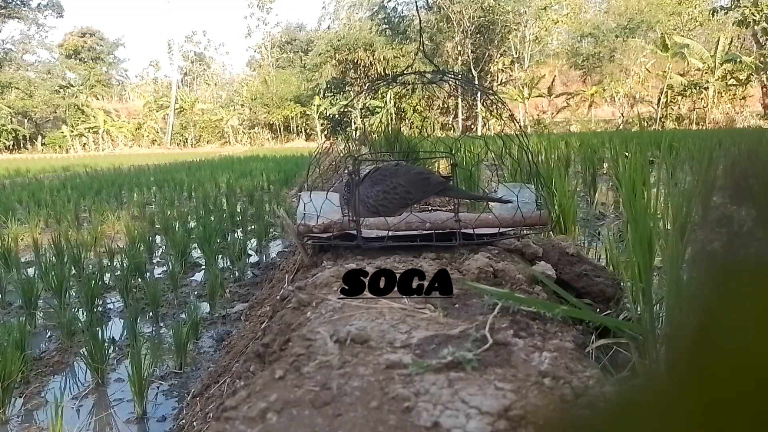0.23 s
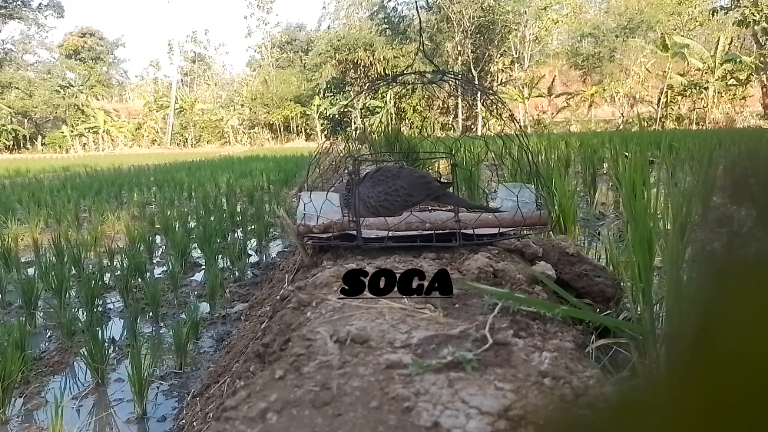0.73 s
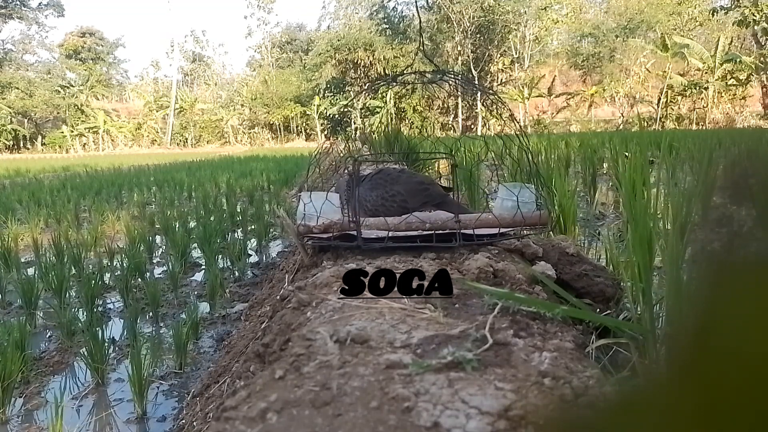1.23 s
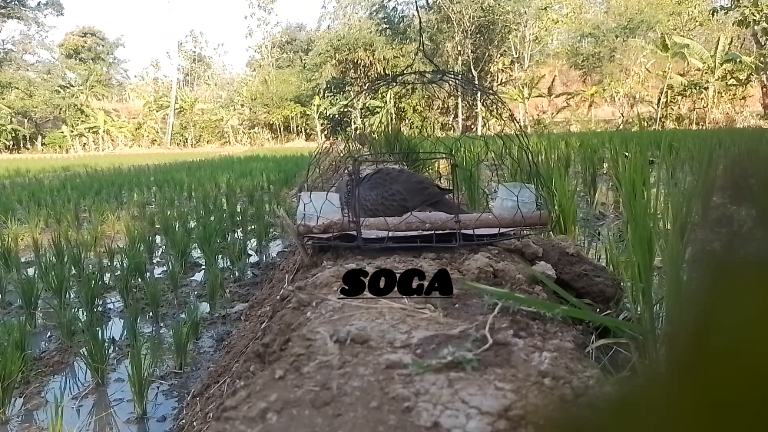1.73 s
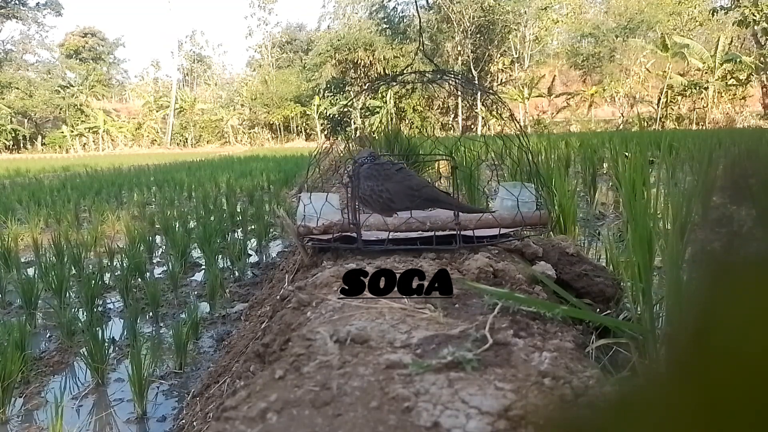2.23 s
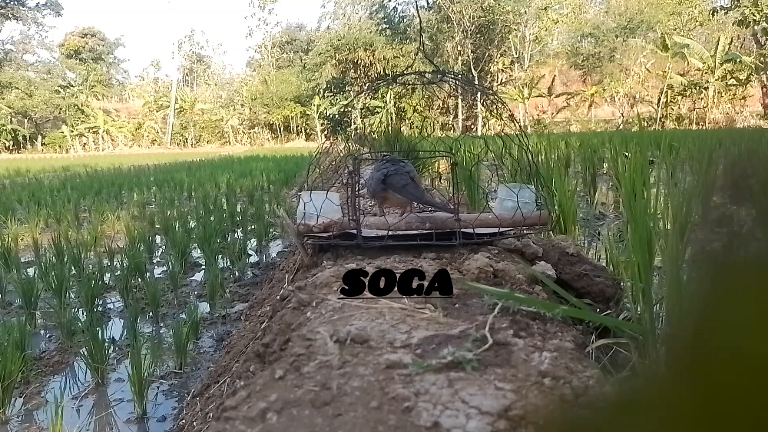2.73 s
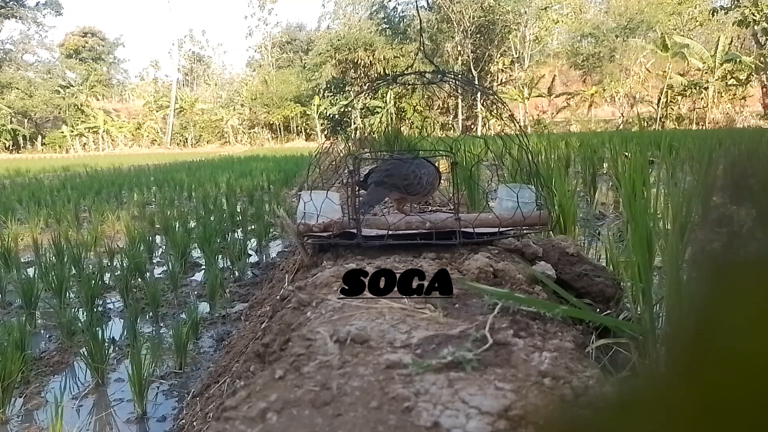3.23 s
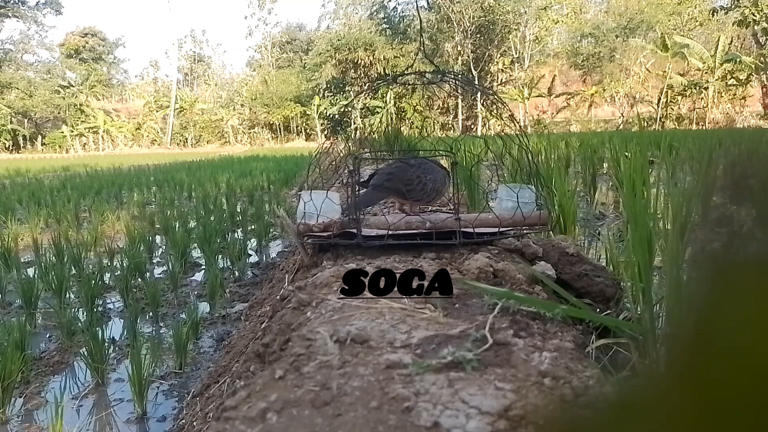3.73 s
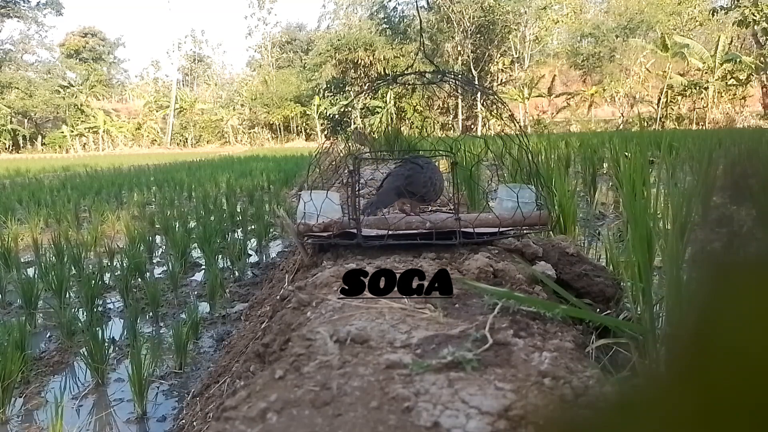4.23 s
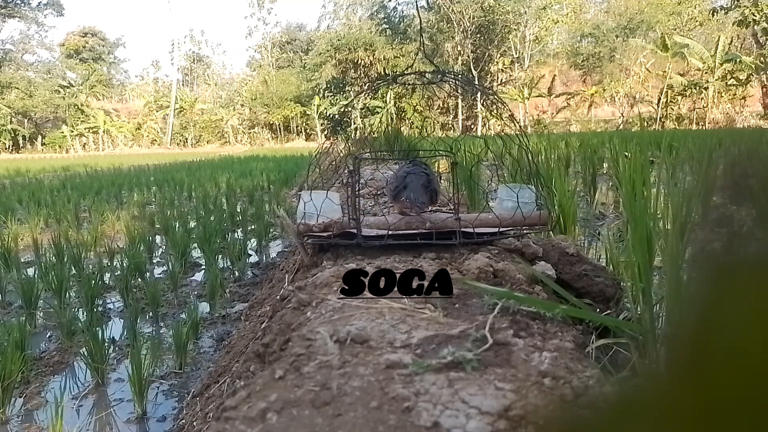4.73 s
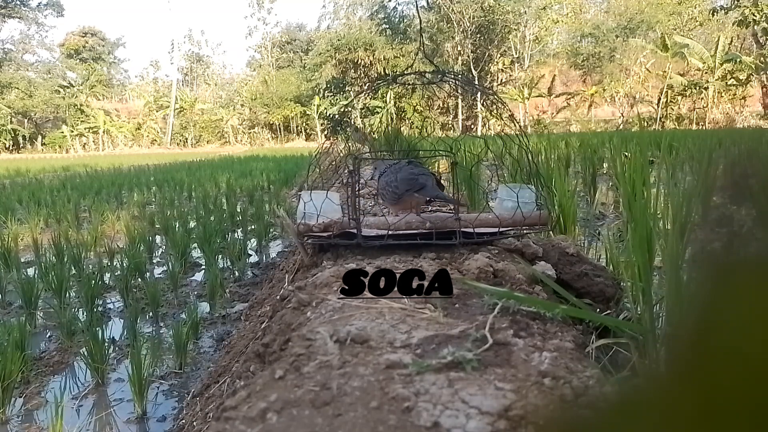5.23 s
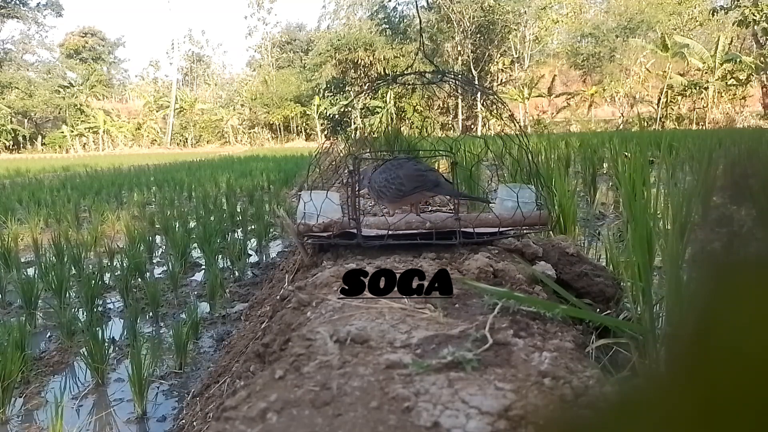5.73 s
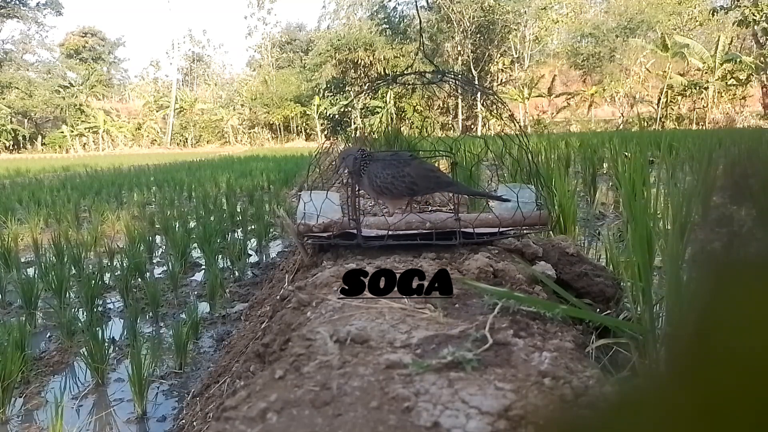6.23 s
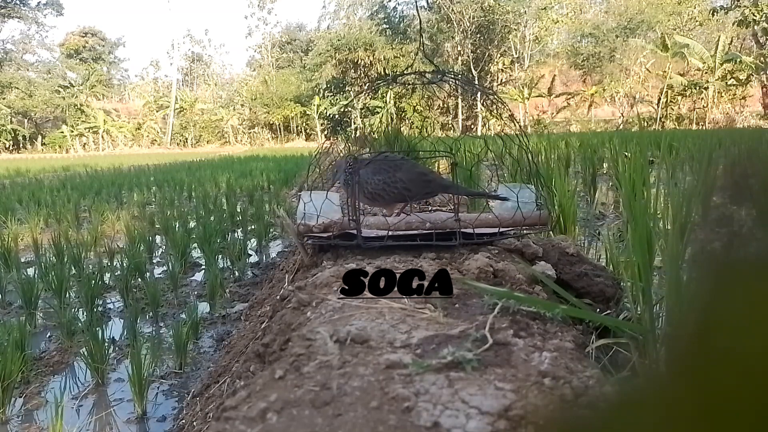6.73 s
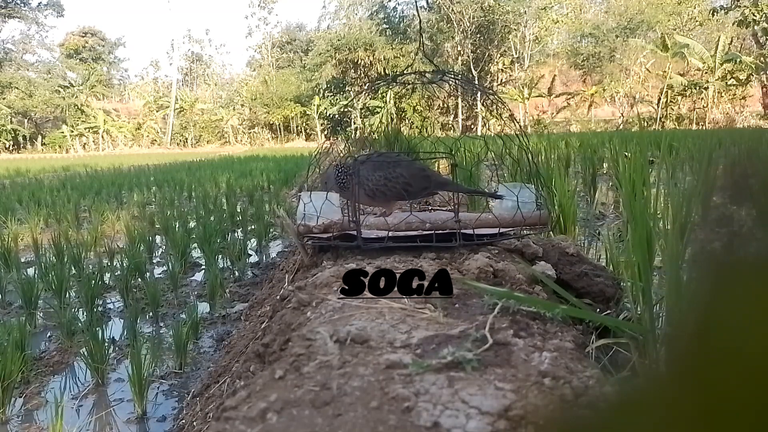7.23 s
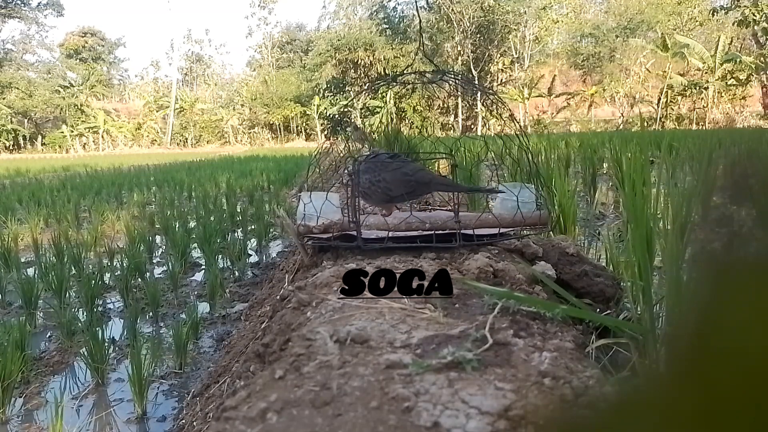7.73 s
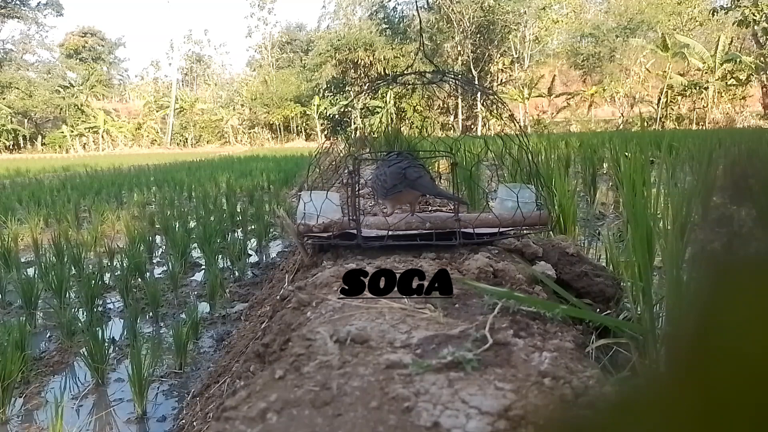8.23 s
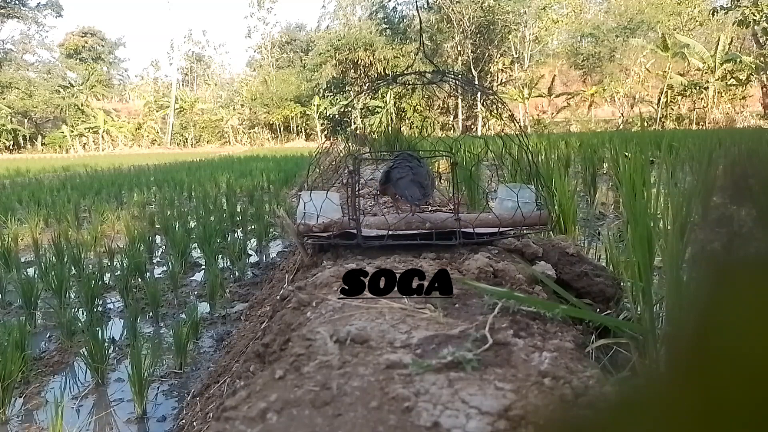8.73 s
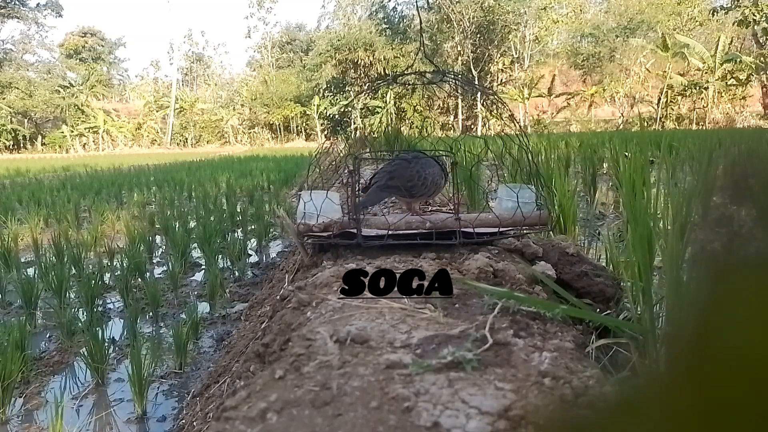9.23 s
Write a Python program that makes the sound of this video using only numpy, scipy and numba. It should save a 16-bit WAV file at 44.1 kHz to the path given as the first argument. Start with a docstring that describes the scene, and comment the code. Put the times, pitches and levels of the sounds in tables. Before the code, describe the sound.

Open rice fields, very quiet soft hum and hiss. A caged dove close to the microphone coos in a hoarse, fluttering low-mid voice around 600 to 700 Hz: a loud half-second coo at 0.1 s, a short one at 0.9, a long one at 1.25, the long ones arching in pitch and ending in a weaker sob. From 1.9 s it has turned away: much softer, slightly lower coos, long at 1.9, 3.2, 4.4, 5.6, 6.8, 8.0 and 9.2, each later one preceded by a short coo. Bright high crickets trill in pulses, strongest around 1.5 to 2.3 s, a second lasting until about 3.6, then only a very faint one from 4 to 9 s. Light cage ticks come near 0.3, 2.1, 4.7, 5.3 and 6.4 s. Distant doves coo faintly in between. From about 2 s a barely audible far engine drones, slowly rising in pitch, then sagging near the end. Soft tree echoes.

```python
"""Caged dove on a paddy bank

A dove coos in short and long notes, first facing the microphones, then turned away and weaker.
Its hoarse tone comes from a phase that runs ahead and slips back on the beats of a slow flutter.
Far doves call with a milder form of that voice; three crickets chirp in runs of gliding wing strokes;
noise bursts through resonances tick on the cage; a distant engine drones in multiples of its firing rate;
shaped noise makes the soft hum and hiss of the fields, and decaying noise makes the echoes."""
import sys
import numpy as np
from scipy import signal
from scipy.fft import rfft, irfft, next_fast_len
from scipy.io import wavfile
from scipy.ndimage import uniform_filter1d
from numba import njit

SR = 44100
rng = np.random.default_rng(int(sys.argv[2]) if len(sys.argv) > 2 else 0)


def dump_mix(stems):
    """Bounce the given channels to the path in sys.argv[1] as a 16-bit WAV at rate SR."""
    frames = np.atleast_2d(stems).T  # one column per channel
    limited = np.clip(frames, -1, 1)  # hard clip at full scale
    pcm = np.round(limited * 32767).astype(np.int16)
    wavfile.write(sys.argv[1], SR, pcm)


N = 418509  # samples
TURN_S = 1.85  # the dove turns away


def undb(db):
    """Decibels to an amplitude ratio: 20 dB per factor of ten."""
    return 10 ** (np.asarray(db) / 20)


def unit(x):
    """Normalisation to a root-mean-square of 1."""
    return x / np.sqrt(np.mean(np.abs(x) ** 2))


def slew(x, ms):
    """One-pole smoothing: exponential relaxation with a time constant in ms."""
    keep = np.exp(-1000 / (ms * SR))
    return signal.lfilter([1 - keep], [1, -keep], x)


def spin(hz):
    """Complex rotation: phase is the running sum of frequency."""
    return np.exp(2j * np.pi * np.cumsum(hz) / SR)


@njit
def svf(x, hz, width):
    """State-variable resonance: a band-pass with gain 1 at its centre."""
    y, b, l = np.empty(len(x)), 0., 0.
    g, k = np.tan(np.pi * hz / SR), width / hz
    for i in range(len(x)):
        v = (b + g * (x[i] - l)) / (1 + g * (g + k))
        b, l, y[i] = 2 * v - b, l + 2 * g * v, k * v
    return y


def band(x, hz, width_hz):
    """Cascaded resonances: the band-pass applied twice has steeper skirts."""
    once = svf(x, 1. * hz, 1. * width_hz)
    return svf(once, 1. * hz, 1. * width_hz)


def walk(rate):
    """Slow random modulation: levels held for 1 / rate s, smoothed twice, spread 1."""
    k = int(SR / rate)
    steps = np.repeat(rng.standard_normal(N // k + 1), k)
    smooth = uniform_filter1d(uniform_filter1d(steps, k), k)
    return unit(smooth[:N])


def place(x, pan_db, size):
    """Stereo cues at two microphone ports: a level difference, and the left hears size samples later."""
    return np.array([np.roll(x, size) * undb(pan_db / 2), x * undb(-pan_db / 2)])


def fields():
    """Coherence of diffuse noise: ports most alike near 600 Hz, less in the bass, little in the treble."""
    # spectrum of the open land: frequency_hz, density_db (relative, per Hz),
    # likeness of the ports (0-1), left_minus_right_db
    spectrum = [(25, -22.5, 0, 1), (61, -18.5, 0.3, -2.5), (94, -15.5, 0.4, -1), (123, -18.5, 0.5, 0),
                (157, -26, 0.7, 1.5), (237, -5.5, 0.7, 2.5), (335, -5.5, 0.6, 0), (617, -7.5, 1, 2.5),
                (1090, -23, 0, 2), (2230, -20, 0.05, 2.5), (3500, -21.5, 0, 0.5), (4480, -19, 0.3, 1.5),
                (5410, -23.5, 0, 6), (7080, -17.5, 0, 10.5), (7900, -21.5, 0, 3.5), (9420, -22.5, 0.3, -6),
                (10600, -34, 0.04, 1), (13400, -34.5, 0.11, -0.5)]
    level_db = -64.5
    size = next_fast_len(N)
    hz = np.fft.rfftfreq(size, 1 / SR) + 1  # 1 Hz up keeps the logarithm finite
    points = np.array(spectrum).T
    db, like, pan_db = (np.interp(np.log(hz), np.log(points[0]), c) for c in points[1:])
    like = np.clip(like, 0, 1)
    noise = rfft(rng.standard_normal((2, size)))
    mid, side = noise * undb(db) * np.sqrt([1 + like, 1 - like])
    left = (mid + side) * undb(pan_db / 2)
    right = (mid - side) * undb(-pan_db / 2)
    out = irfft([left, right], size)[:, :N]
    return unit(out) * undb(level_db + 0.96 * walk(3.2))


def engine():
    """Harmonic series of a periodic source: multiples of the firing rate, each flickering on its way."""
    # course of the engine: time_s, firing_hz, level_db (of the whole engine)
    course = [(1.8, 43.1, -87.5), (2.5, 44, -78), (3.65, 45.48, -75.5), (4.4, 45.8, -76.5),
              (5.1, 47.22, -74), (6, 50.04, -78.5), (7.101, 51.24, -78.5), (8, 52.84, -79),
              (8.9, 53.1, -77), (9.25, 51.44, -74), (9.49, 49.6, -80.5)]
    # strength of each multiple: multiple, relative_level_db
    orders = [(2, -13.5), (3, -21.5), (4, -5.5), (5, 3.5), (6, 3.5), (7, -10)]
    rumble_db = -6
    s, hz, db = np.transpose(course)
    t = np.arange(N) / SR
    phase = 2 * np.pi * np.cumsum(np.interp(t, s, hz) + .25 * walk(6)) / SR
    toneless = unit(band(rng.standard_normal(N), 108, 60))
    rumble = undb(rumble_db + 1.1 * walk(4)) * toneless
    tones = sum(undb(rel_db + 2.2 * walk(3.2)) * np.sin(k * phase) for k, rel_db in orders)
    return undb(np.interp(t, s, db)) * (rumble + tones)


def trees(x, t60_s, wet_db):
    """Reverberation as exponentially decaying noise: scattered echoes, partly different at each port."""
    t = np.arange(int(t60_s * SR)) / SR
    decay = np.exp(-np.log(1000) * t / t60_s)  # 60 dB down at t60_s
    tail = rng.standard_normal((2, len(t))) * decay * (t > .012)  # first echo after 12 ms
    tail = tail[0] + .5 * tail[1] * np.array([[1], [-1]])
    tail = tail / np.sqrt(np.sum(tail[0] ** 2))
    return undb(wet_db) * signal.fftconvolve(x[None], tail, axes=1)[:, :N]


def cage():
    """Impulse excitation of resonances: claws and beak tick the wires, a dull knock and a bright edge."""
    # contacts: start_s, knock_db, edge_db, wire_hz (the resonance that is struck hardest)
    ticks = [(0.2742, -50, -69.5, 1690), (2.112, -52, -74, 1690), (4.7227, -42, -70, 2000),
             (5.3045, -42, -52.5, 1690), (6.371, -51.5, -70, 1250), (6.4150, -50.5, -56, 1250)]
    # wire resonances: frequency_hz, width_hz, relative_level_db
    wires = [(950, 370, -7), (1250, 290, 3.5), (1690, 310, 2.5), (2440, 900, -5.5)]
    falloff_db = 11.5  # per octave away from wire_hz
    knocks, edge = np.zeros((len(wires), N)), np.zeros(N)
    for s, knock_db, edge_db, wire_hz in ticks:
        at = int(s * SR)
        burst = rng.standard_normal(500) * np.exp(-np.arange(500) / 110)
        octaves = np.abs(np.log2(np.array(wires)[:, 0] / wire_hz))
        knocks[:, at:at + 500] += np.outer(undb(knock_db - falloff_db * octaves), burst)
        edge[at:at + 500] += burst * undb(edge_db)
    dull = sum(undb(db) * svf(knock, 1. * f, 1. * w) for knock, (f, w, db) in zip(knocks, wires))
    return undb(3.0) * dull + undb(7.5) * svf(edge, 7500., 5000.)


def cricket(marks, spread_hz, stroke_hz, glide, low_db, low_share, stroke_s):
    """Stridulation: each chirp is a run of brief wing strokes that glide down and swell towards its end."""
    chirp_s, pause_s = .127, .03  # usual time from chirp to chirp, rest between chirps
    out = np.zeros((2, N + 400))
    t = np.arange(-150, 150) / SR
    window = np.exp(-(t / stroke_s) ** 2)
    marks = np.array(marks)
    # chirps are spread evenly between the marks
    number = np.cumsum(np.round(np.diff(marks[:, 0], prepend=marks[0, 0]) / chirp_s))
    chirps = np.array([np.interp(np.arange(number[-1] + 1), number, c) for c in marks.T])
    since = np.diff(chirps[0], prepend=chirps[0, 0] - chirp_s)
    for (end_s, db, pan_db, wing_hz, swell_db), since_s in zip(chirps.T, since):
        count = round((since_s - pause_s) * stroke_hz)
        hz = wing_hz + spread_hz * rng.standard_normal()
        # k counts back from the last stroke
        for k, (late, size, turn) in enumerate(rng.standard_normal((count, 3))):
            at = int((end_s - (k + 0.75) / stroke_hz + 0.000074 * late) * SR)
            phase = 2 * np.pi * hz * (t * (1 - glide * t) + at / SR)
            low_tone = undb(low_db) * np.sin(low_share * phase + 9 * turn)
            stroke = window * (np.sin(phase + 0.88 * turn) + low_tone)
            level = undb(db + 9.0 - swell_db * (k / count) ** 1.6 + 2.2 * size)
            if at > 0:
                out[:, at:at + 300] += np.outer(undb([pan_db, 0]), stroke) * level
    out[0] = np.roll(out[0], 21)  # the left port hears later: the crickets sit to the right
    return out[:, 150:N + 150]


def crickets():
    """Superposition of independent sources: three crickets with their own wing pitch and stroke rate."""
    # per cricket: end_s of a chirp, relative_level_db, left_minus_right_db, wing_pitch_hz, swell_db
    marks = { "near": [(0.02, -65, 0, 8570, 10), (0.405, -52.5, -6, 8770, 16),
             (0.52, -54.5, -4.5, 8840, 13), (1.04, -48.5, -4.5, 8930, 12.5), (1.575, -42, -4.5, 8800, 7.5),
             (1.985, -42, -5.5, 8830, 3), (2.128, -41, -3.5, 8900, 1.5), (2.258, -43, -4.5, 8900, 3)],
             "second": [(0.1, -62.5, -5, 9200, 7), (0.346, -65, -7.5, 9270, 6.5),
             (1.2, -58, -8.5, 9070, 4.5), (1.688, -56, -6.5, 9160, 6), (2.176, -51.5, -9, 9040, 0),
             (2.293, -49.5, -7, 9046, 8), (2.769, -55.5, -0.5, 9060, 7), (3.025, -57, -13, 9140, 8),
             (3.292, -54.5, -13, 9100, 4.5), (3.583, -58, -8, 9020, 0.5)],
             "far": [(4.205, -77, -17, 9170, 12), (4.826, -70.5, -10, 9250, 16), (5.423, -71, -8, 9260, 10),
             (6.042, -70, -12, 9230, 8), (6.658, -69.5, -15, 9230, 11), (7.263, -66, -14, 9230, 15),
             (7.866, -66, -21, 9230, 5.5), (8.474, -63.5, -16, 9250, 6.5), (8.856, -66.5, -17, 9230, 5)], }
    near = cricket(marks["near"], spread_hz=62, stroke_hz=123.8, glide=6.3,
                   low_db=-24.5, low_share=0.912, stroke_s=0.0017)
    second = cricket(marks["second"], spread_hz=23.0, stroke_hz=121.5, glide=5.5,
                     low_db=-19.5, low_share=.932, stroke_s=0.0023)
    far = cricket(marks["far"], spread_hz=22, stroke_hz=130, glide=4.4,
                  low_db=-8, low_share=.94, stroke_s=.0021)
    return near + second + far


def notes(tables):
    """Piecewise-linear contours: columns of all notes over time, and a gain silent between notes."""
    t = np.arange(N) / SR
    rows = np.array(sorted(r for note in tables for r in note))
    sounding = sum((t >= note[0][0]) & (t <= note[-1][0]) for note in tables)
    columns = [np.interp(t, rows[:, 0], c) for c in rows.T[1:]]
    gain = np.interp(t, rows[:, 0], undb(rows[:, 2]))
    return columns, gain * uniform_filter1d(1. * sounding, size=400)


def hoarse(hz, flutter_hz, gained, chance, above_hz, waver_hz, scatter):
    """Phase slips of a membrane: it runs ahead and slips back on flutter beats; a throat filters it."""
    most_turns = .63  # the largest slip
    sudden = 0.74  # share of a slip that is sudden
    rebuild_ms = 1.1  # the swing rebuilds after a slip, so level and pitch dip there
    pinch, pinch_ms = 0.64, 1.4  # the airflow chokes by this share at each slip
    throat_reach_hz = 166  # passed to each side of the throat's tuning
    beat = np.cumsum(flutter_hz + 8 * walk(90)) / SR
    whole = beat.astype(int)
    kick, odds = rng.standard_normal(N // 200), rng.random(N // 200)
    odds[::3] = 0  # every third beat slips, so it never holds longer than three beats
    slips = (np.diff(whole, prepend=0) > 0) & (odds[whole] < chance)
    ahead = np.cumsum(gained * np.gradient(beat))
    last = np.maximum.accumulate(slips * np.arange(N))
    lost = np.cumsum(np.minimum(np.diff(ahead[last], prepend=0), most_turns))
    # the rest of a slip drags the pitch down and lets it climb back
    slipped = sudden * lost + (1 - sudden) * slew(lost, 2.9)
    turns = ahead - slipped + scatter * np.cumsum(slips * kick[whole])
    swing = slew(slew(np.exp(2j * np.pi * turns), rebuild_ms), rebuild_ms)
    grip = swing * undb(1.1 * walk(120))
    pulse = slew(slew(1. * slips, pinch_ms / 2), pinch_ms / 2)
    choke = pulse * np.e * pinch_ms / 2 * SR / 1000  # peak 1
    grip = grip * (1 - np.clip(pinch * choke, 0, 1))
    # shift the throat's tuning to zero, low-pass there, even out the level
    low_pass = signal.butter(4, throat_reach_hz, fs=SR, output="sos")
    throat = signal.sosfilt(low_pass, grip / spin(above_hz))
    throat = throat / np.sqrt(uniform_filter1d(np.abs(throat) ** 2, size=2000) + 1e-9)
    return unit((throat * spin(hz + above_hz + waver_hz * walk(90))).real)


def far_doves():
    """Weak phase slips: the same voice with a small phase gain per beat and a random waver."""
    # distant coos: start_s, length_s, pitch_hz, level_db, fade_db, waver_hz
    far_coos = [(0.657, 0.13, 745, -72, 16, 35), (2.1, 0.45, 489, -60, 0.5, 25.17),
                (2.563, 0.38, 492, -60.5, 5.5, 1.64), (3.055, .11, 502, -61, 7, 20),
                (3.76, 0.24, 741, -70, 18, 33), (4.28, 0.11, 500, -59, 11, 16),
                (4.959, 0.27, 502.5, -59.5, 14, 21.5), (5.481, 0.087, 507, -63, 11, 22.6),
                (6.667, .1, 522, -62, 12, 34), (7.317, 0.32, 746, -63, 15, 39)]
    points = [[(s, hz, db, waver), (s + length, hz, db - fade, waver)]
              for s, length, hz, db, fade, waver in far_coos]
    (hz, db, waver_hz), gain = notes(points)
    voice = hoarse(hz, 125, 0.086, 0.11, 0 * hz, waver_hz=waver_hz, scatter=0.0497)
    return gain * voice * undb(0.1 * waver_hz * walk(40))


def coo(start_s, length_s, db, hz, arch_hz, fade_db, flutter_hz, deep, slip):
    """Breath and tension contours of one coo, as points
    (s, pitch Hz, level dB, flutter Hz, turns gained per beat, slip chance)."""
    attack_s, release_s, fade_s = 0.049, 0.022, 0.0044
    attack_db, release_db = 17, 14.5  # depth from which a coo starts and to which it stops
    swell_db, swell_s = 7, 0.087  # after the attack the level still creeps up
    wane_s, wane_db_per_s = 0.3, 11  # late in a long coo the breath runs low
    sob_s, sob_hz_per_db = 0.033, 7  # a coo may close with a weaker, lower sob
    catch_s = 0.0022  # the breath catches before the sob
    arch_span, arch_skew = 0.96, .6  # share of the arch that is sung; under 1 the pitch peaks early
    droop_hz_per_s = 39  # the pitch sinks as a coo goes on
    scoop_hz, scoop_s = 80, .022  # the pitch slides up into each coo
    sink_hz, sink_s = 85.4, .02  # and slides down out of it
    deep_turns, shallow_turns, away_turns = 0.58, 0.37, .37  # phase gained per flutter beat
    slip_facing, slip_away, slip_end = .88, .74, .93  # chance per beat in deep flutter and at the end
    facing = start_s < TURN_S
    t = np.linspace(0, length_s, num=300)
    share, left = t / length_s, length_s - t

    attack = attack_db * np.clip(1 - t / attack_s, 0, 1) ** 1.9
    release = release_db * np.clip(1 - left / release_s, 0, 1)
    swell = swell_db * np.exp(-t / swell_s)
    wane = wane_db_per_s * np.clip(t - wane_s, 0, 1)
    sob_db = fade_db * np.clip(1 - (left - sob_s) / fade_s, 0, 1)
    catch = 1.5 * fade_db * np.exp(-((left - sob_s + catch_s) / catch_s) ** 2)
    level = db - catch - swell - sob_db - wane - attack - release

    arch = arch_hz * np.sin(np.pi * arch_span * share ** arch_skew)
    scoop = scoop_hz * np.exp(-t / scoop_s)
    sink = sink_hz * np.clip(1 - left / sink_s, 0, 1)
    pitch = hz + arch - droop_hz_per_s * (t - .2) - scoop - sink - sob_hz_per_db * sob_db

    later_turns = shallow_turns if facing else away_turns
    turns = np.interp(share, [deep - .1, deep + 0.14], [deep_turns, later_turns])
    early_slip = slip_facing if facing else max(slip_away, slip)
    chance = np.interp(share, [deep - .06, deep + .06, max(deep + .07, .75), 1.1],
                       [early_slip, slip, slip, slip_end])
    return list(zip(start_s + t, pitch, level, flutter_hz + 0 * t, turns, chance))


def dove():
    """Voiced tone and turbulence: a hoarse tone, a faint overtone by squaring, and late, lingering breath."""
    # near coos: start_s, length_s, base_level_db, base_pitch_hz, arch_hz (rise of the pitch arch),
    # fade_db (drop into the sob), flutter_hz, deep (share with deep flutter, 0-1),
    # slip (chance per beat after that, 0-1)
    coos = [(0.08, .548, -25, 624.6, 72, 8, 128.5, .25, .36),
            (0.935, .212, -26, 642, 20.05, 1.5, 109.6, 0.9, .9),
            (1.247, 0.51, -25, 638.2, 70, 7.5, 129.1, .24, .4),
            (1.934, .533, -39.5, 583.3, 36, 0.5, 128.2, 0.7, .95),
            (2.863, 0.175, -42, 556.6, 24.5, 2, 108.9, 0.9, .75),
            (3.185, .548, -38.5, 579.7, 38, 0.5, 127, 0.86, .8),
            (4.091, .17, -40.5, 575.6, 34.14, 1, 106.8, .8, .8),
            (4.399, .546, -38.5, 585.6, 30, 0.5, 127.3, 0.8, .7),
            (5.305, .16, -40, 592.3, 33.4, 1, 106.9, 0.6, .8),
            (5.592, 0.528, -39, 593, 28, 4.5, 127.6, .65, .7),
            (6.498, .158, -40.5, 586, 34, 0.5, 106.9, 0.7, .8),
            (6.783, .526, -38.5, 596.3, 35, 0.5, 126.2, .6, .7),
            (7.718, 0.15, -40, 582, 34.7, 1.5, 107.4, 0.4, .8),
            (7.997, .532, -39, 587, 33, 3, 127.3, 0.5, .7),
            (8.904, 0.15, -40, 587, 33.96, 1.5, 106.3, 0.6, .8),
            (9.197, 0.54, -39, 588, 36, 0, 124.2, 0.47, .7)]
    throat_above_hz, low_coo_hz = 61, 587  # the throat tunes itself this far above a low coo
    throat_lag = 0.66  # share by which it falls behind when the pitch rises
    (hz, db, flutter_hz, gained, chance), gain = notes([coo(*row) for row in coos])
    above_hz = throat_above_hz - throat_lag * (hz - low_coo_hz)
    voice = hoarse(hz, flutter_hz, gained, chance, above_hz, waver_hz=6, scatter=.14)
    overtone = undb(-53.5) * unit(band(voice ** 2, 1266, 220))
    rasp_band = signal.butter(5, [1775, 2560], "band", fs=SR, output="sos")  # Hz
    effort = slew(gain, 23) / undb(-28.0)
    lingers = slew(slew(gain, 73), 22) / undb(-27.0 + 1.5 * walk(25))
    ports = []
    for noise in rng.standard_normal((2, N)):  # independent noise at each port
        rasp = undb(-69) * unit(signal.sosfilt(rasp_band, noise)) * lingers ** 1.4
        middle = undb(-72) * unit(band(noise, 1280, 120)) * lingers ** 4.0
        breath = undb(-59.5) * unit(band(noise, 908, 200)) * effort ** 1.12
        ports.append(rasp + middle + breath)
    chest_noise = unit(band(rng.standard_normal(N), 410, 290))
    chest = undb(-58.5) * chest_noise * slew(gain, 83) / undb(-28.5)
    return gain * (voice + overtone), np.array(ports) + chest


def scene():
    """Linear superposition of all sources and their echoes at the two ports."""
    bird, breath = dove()
    chirps = crickets()
    echoes = trees(bird, 0.38, -19) + trees(chirps[1], 0.039, -14)
    background = fields() + engine() + echoes
    pan_db = np.where(np.arange(N) < TURN_S * SR, 0.9, 2.5)  # facing, then turned away
    far = place(far_doves(), .6, size=3)
    ticks = place(cage(), 1.2, size=5)
    return background + ticks + chirps + far + breath + place(bird, pan_db, size=8)


def record(dry):
    """Band limiting: a steep elliptic low-pass removes the top."""
    top_hz = 14200
    return signal.sosfilt(signal.ellip(8, .2, 70, top_hz, fs=SR, output="sos"), dry)


dry = scene()
out = record(dry)
dump_mix(out)
```